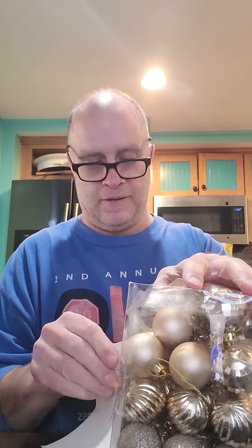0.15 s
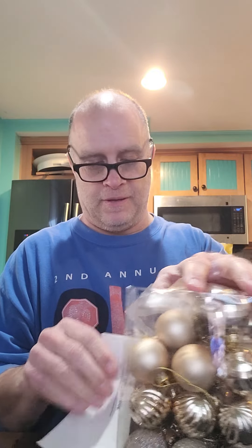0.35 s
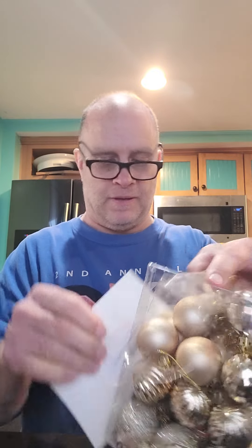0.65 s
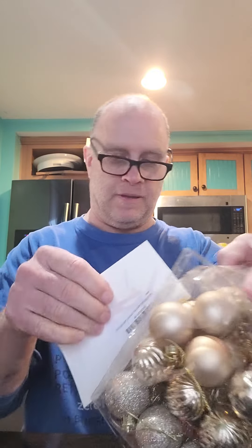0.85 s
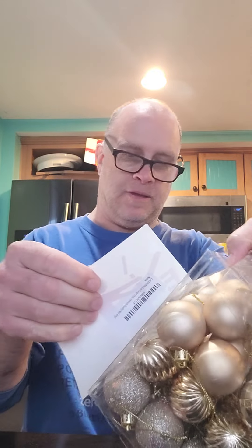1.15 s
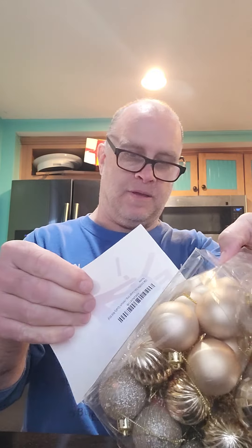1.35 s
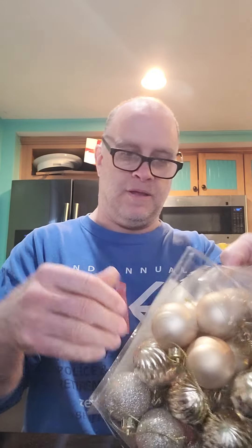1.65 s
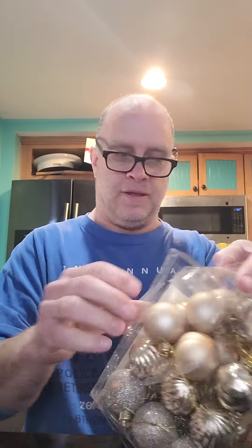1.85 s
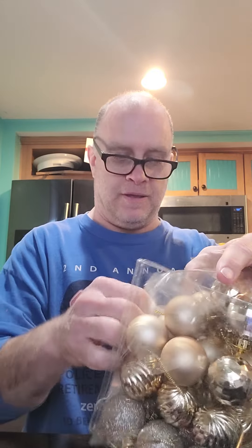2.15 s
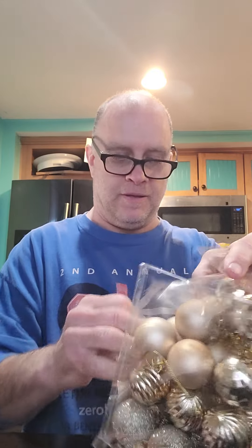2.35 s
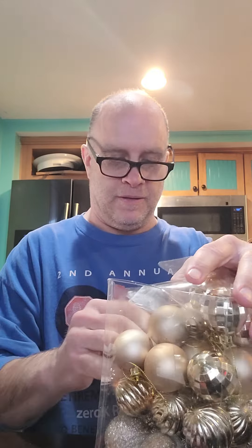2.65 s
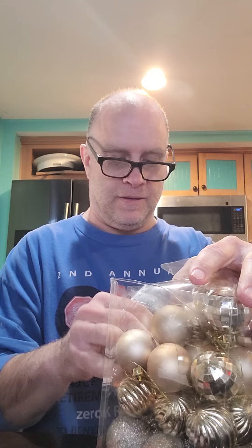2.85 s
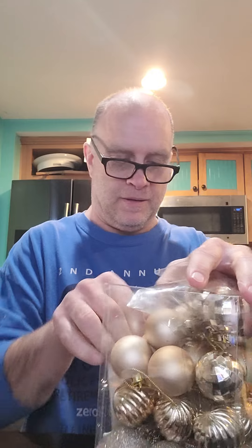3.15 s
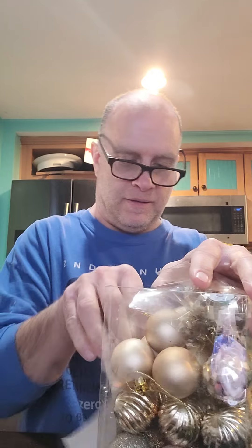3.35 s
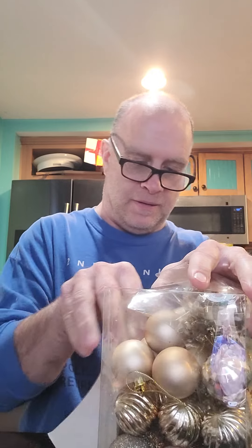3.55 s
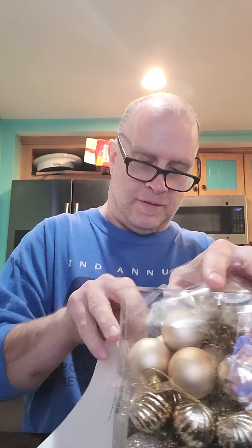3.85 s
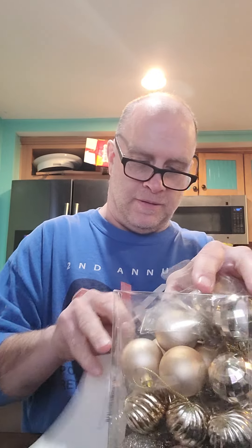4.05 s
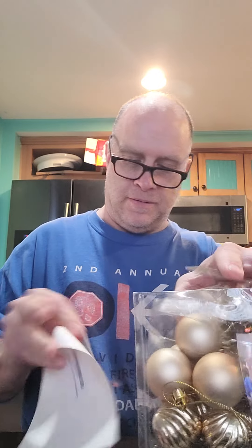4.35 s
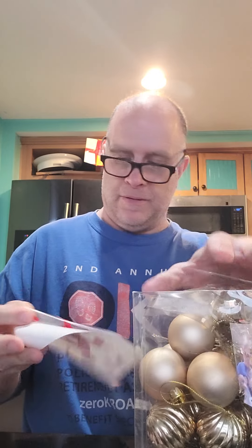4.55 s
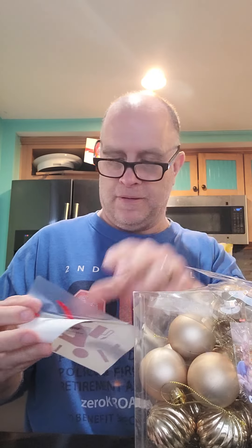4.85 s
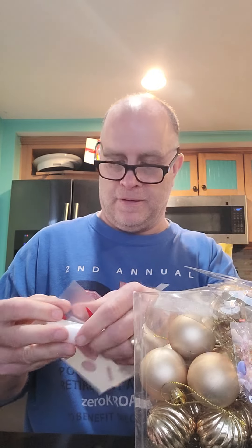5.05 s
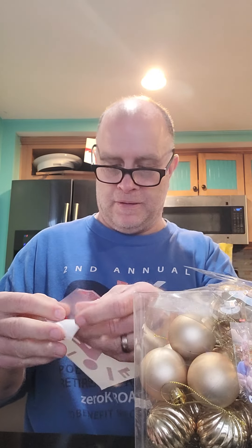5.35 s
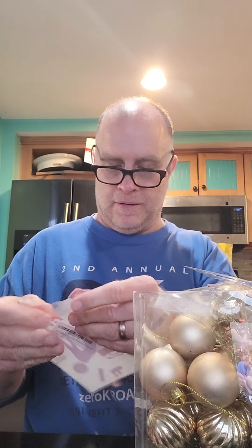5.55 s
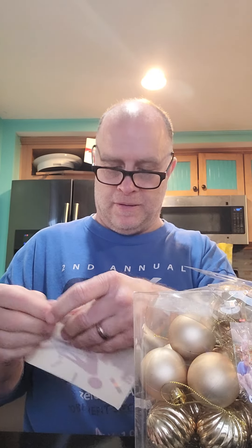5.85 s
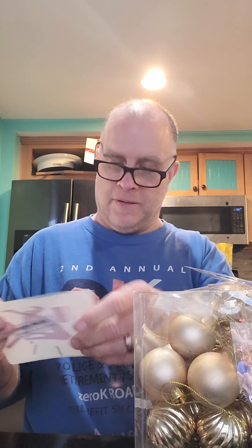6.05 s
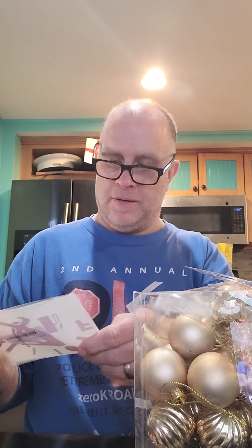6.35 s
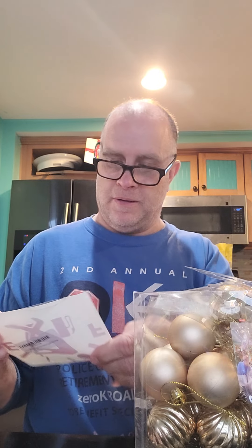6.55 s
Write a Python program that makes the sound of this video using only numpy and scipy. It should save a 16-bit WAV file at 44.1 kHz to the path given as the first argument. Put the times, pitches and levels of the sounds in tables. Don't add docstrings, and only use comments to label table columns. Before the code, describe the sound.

Close stereo phone pickup, slightly stronger on the right, with a short, small-room echo. Thin rigid plastic buckles in sharp cracks, dents pop hollowly, corners ping, and the box thuds on the table. Sparse crackles build to two dense bursts, the second strongest. Afterwards a label rustles and creases quietly. A very faint refrigerator hum surfaces only with the handling.

```python
import sys
import numpy as np
from scipy import signal
from scipy.io import wavfile

SR = 44100
rng = np.random.default_rng(int(sys.argv[2]) if len(sys.argv) > 2 else 0)


def to_wav(sig):
    pcm = np.clip(np.atleast_2d(sig), -1, 1) * 32767
    pcm = np.round(pcm).astype(np.int16)
    wavfile.write(sys.argv[1], SR, pcm.T)


def gain_from_db(level_db):
    decades = np.asarray(level_db, float) / 20
    return 10 ** decades


N = 295029
PORT_LAG = 12


def rms_one(x):
    return x / np.sqrt(np.mean(x ** 2) + 1e-20)


def at_hz(points, hz):
    table_hz, value = np.transpose(points)
    return np.interp(np.log(hz), np.log(table_hz), value)


def band(x, low_hz, high_hz):
    sos = signal.butter(2, [low_hz, min(high_hz, SR / 2.2)], "band", fs=SR, output="sos")
    return signal.sosfilt(sos, x)


def drift(rate_hz):
    r = np.exp(-80 * np.pi * rate_hz / SR)
    slow = signal.lfilter([1], [1, -2 * r, r * r], rng.standard_normal(N // 40 + 2002))[2000:]
    return np.interp(np.arange(N) / 40, np.arange(len(slow)), rms_one(slow))


def clicks(times_s, heights):
    train = np.full(N, 1e-18)
    train[np.clip((np.asarray(times_s) * SR).astype(int), 0, N - 1)] = heights
    return train


def ring(train, hz, t60_s):
    r, w = gain_from_db(-60 / (t60_s * SR)), 2 * np.pi * hz / SR
    return signal.lfilter([0, np.sin(w)], [1, -2 * r * np.cos(w), r * r], train)


def dying(train, t60_s):
    return signal.lfilter([1], [1, -gain_from_db(-60 / (t60_s * SR))], train)


def struck(rows, t60_s, cycles):
    out, t = np.zeros(N + SR), np.arange(SR // 4) / SR
    for s, peak_db, hz in rows:
        at = round(s * SR)
        decay_s = t60_s + cycles / hz
        out[at:at + len(t)] += gain_from_db(peak_db - 60 * t / decay_s) * np.sin(2 * np.pi * hz * t)
    return out[:N]


def contact(x, length_s):
    push = np.hanning(max(round(length_s * SR), 3))
    return np.convolve(x, push / push.sum())[:N]


def pair(white, hz):
    # frequency in [Hz], left-right likeness [0 to 1].
    port_likeness = [(60, 0.87), (180, 0.93), (550, .92), (1650, 0.6), (4970, 0.1), (15000, 0.02)]
    alike = np.clip(at_hz(port_likeness, hz), 0, 1)
    return np.sqrt(1 + alike) * white[0] + np.sqrt(1 - alike) * white[1] * np.array([[1], [-1]])


def coloured(white, spectrum, low_hz, high_hz, flicker_db):
    out = 0
    edges_hz = low_hz * 2 ** np.arange(0, np.log2(high_hz / low_hz) + .4, .5)
    for k, (low, high) in enumerate(zip(edges_hz, edges_hz[1:])):
        hz = np.sqrt(low * high)
        level = gain_from_db(at_hz(spectrum, hz) + flicker_db * drift(17))
        out = out + level * band(pair(white[k % 2], hz), low, high)
    return rms_one(out)


def refrigerator():
    # line frequency in [Hz], level in [dB].
    compressor_lines = [(60, -85), (268, -66), (545, -72)]
    waver_s = np.cumsum(1 + 0.015 * drift(8.8)) / SR
    hum = 0
    for hz, level_db in compressor_lines:
        hum = hum + gain_from_db(level_db + 3.5 + 2.0 * drift(2.7)) * np.sin(2 * np.pi * hz * waver_s)
    return hum


def table_rumble(rub_db):
    # time in [s], rumble level in [dB].
    arm_lean = [(0.0, -51), (0.26, -59), (0.61, -57), (1.08, -73), (1.75, -46), (1.92, -60), (2.44, -45),
                (2.79, -72), (3.72, -58), (4.15, -58), (4.319, -53.5), (4.531, -60), (4.73, -71),
                (5.38, -75), (5.55, -71), (6.32, -62), (6.45, -58.5), (6.69, -70.5)]
    lean_db = np.interp(np.arange(N) / SR, *np.transpose(arm_lean))
    level_db = lean_db - 0.5 + 0.46 * (rub_db - rub_db.mean())
    side = 0.27 * rng.standard_normal(N) * [[1], [-1]]
    rumble = rms_one(band(rng.standard_normal(N) + side, 28, 230))
    return gain_from_db(level_db + 2.0 * drift(1.6)) * rumble


def thuds():
    # time in [s], peak in [dB], pitch in [Hz].
    table_thuds = [(0.048, -33.5, 154.8), (0.407, -32, 116), (0.508, -39, 89), (0.662, -34, 74),
                   (1.688, -47, 132), (1.764, -39, 138), (1.982, -46, 100), (2.089, -37, 103),
                   (2.154, -37, 137), (2.347, -21, 162.5), (2.413, -27.5, 76), (2.587, -58, 51.1),
                   (2.586, -50, 148), (2.687, -51, 139), (2.97, -54, 156), (3.187, -40, 127),
                   (3.349, -32, 162), (3.498, -29, 146), (3.653, -53.5, 140.5), (3.83, -36.5, 163.4),
                   (3.828, -30, 136), (3.982, -26, 157), (4.201, -34.5, 160), (4.205, -25, 89),
                   (4.478, -39, 160), (4.574, -31, 160), (5.642, -45, 144), (6.284, -48, 96),
                   (6.412, -30.5, 106), (6.572, -42, 118), (0.17, -48, 60), (0.92, -48, 65), (1.3, -50, 60),
                   (1.37, -53, 62), (1.84, -45, 60), (3.09, -52, 62), (3.27, -45, 60), (4.3, -37, 65),
                   (4.68, -48.5, 70), (6.33, -45, 60)]
    out, t = np.zeros(N + SR), np.arange(SR // 5) / SR
    for s, peak_db, hz in table_thuds:
        at = round((s + .007) * SR)
        out[at:at + len(t)] += gain_from_db(peak_db + 3.0 - 60 * t / 0.072) * np.sin(2 * np.pi * hz * t)
    return contact(out[:N], 0.0068)


def strokes():
    # start in [s], length in [s], rustle in [dB], rubbing in [dB].
    hand_strokes = [(0.0, 0.015, -30.5, -21), (0.379, 0.085, -50, -41.5), (0.522, 0.4, -61, -46.5),
                    (1.113, 0.035, -60, -43.5), (1.295, 0.072, -76, -53), (1.45, 0.15, -72.5, -63.5),
                    (1.638, .12, -60.5, -45.5), (1.954, .08, -66, -43), (2.081, .25, -57, -40),
                    (2.429, 0.23, -53.5, -45.5), (2.619, 0.19, -60, -43.5), (4.76, .2, -71.5, -73.5),
                    (2.925, .07, -67, -54), (3.099, .2, -64, -51), (3.352, 0.18, -56, -45.5),
                    (3.52, 0.28, -55.5, -50), (3.758, .2, -47.5, -46), (4.049, 0.2, -31.5, -23.5),
                    (4.243, .07, -66, -34.5), (4.419, 0.18, -59, -41.5), (4.63, 0.091, -71.5, -59),
                    (5.111, .09, -67.5, -62.5), (5.206, .05, -56, -54), (5.303, 0.095, -57, -56.5),
                    (5.455, 0.2, -50, -51), (5.705, .11, -58.5, -57), (5.877, .05, -58.5, -51),
                    (5.956, 0.12, -45.5, -45.5), (6.217, 0.2, -66.5, -56.5), (6.523, 0.03, -60, -58)]
    rise_db_per_s, fall_db_per_s = 291.5, 214
    rest_db = np.array([[-91.5], [-63.5]])
    t = np.arange(0, N + 40, 40) / SR
    power = gain_from_db(2 * rest_db) * np.ones(len(t))
    for s, length_s, *levels_db in hand_strokes:
        fade_db = rise_db_per_s * np.maximum(s - t, 0) + fall_db_per_s * np.maximum(t - s - length_s, 0)
        power = power + gain_from_db(2 * (np.array(levels_db)[:, None] - fade_db))
    return [np.interp(np.arange(N) / SR, t, 10 * np.log10(p)) for p in power]


def grains(per_s, spread_db, smooth):
    born = rng.random(N) < per_s * gain_from_db(4.0 * drift(25.0)) / SR
    sizes = gain_from_db(spread_db * np.minimum(rng.exponential(1, N), 4)) * born
    return (rms_one(sizes) + smooth) * rng.standard_normal((2, 2, N))


def hands(rustle_db, rub_db):
    # frequency in [Hz], density in [dB per Hz].
    rustle_spectrum = [(710, -36), (1200, -6), (1440, -5), (2790, -13.5), (5020, -2), (8820, -9),
                       (12300, -10.5), (16000, 2.5)]
    rub_spectrum = [(76, -35), (130, -17), (188, -11), (269, 2.5), (307, -17.5), (351, 6), (830, -22),
                    (1020, -8), (2210, -24), (4500, -25), (5850, -58), (9900, -120)]
    paper = grains(3000, spread_db=2.5, smooth=1.1)
    skin = grains(1200, spread_db=2.5, smooth=.45)
    rustle = gain_from_db(rustle_db - 2) * coloured(paper, rustle_spectrum, 1400, 16500, flicker_db=1.6)
    rub = gain_from_db(rub_db - 6) * coloured(skin, rub_spectrum, 140, 4400, flicker_db=1.5)
    return rustle + rub


def pushes():
    # time in [s], peak in [dB], knock in [dB], wall pitch in [Hz].
    firm_pushes = [(0.049, -16, -9, 250), (0.41, -31, -17, 240), (0.667, -35, -9, 377),
                   (0.882, -37, -1, 261), (1.006, -41, 2.5, 261), (1.117, -37.5, 2, 242),
                   (1.773, -24.5, 2, 231), (1.991, -34, -5.5, 223), (2.093, -30.5, -2.5, 261),
                   (2.213, -40, -11, 272), (2.361, -15.5, -16.5, 250), (2.473, -33, 1, 417),
                   (2.596, -23, -7, 264), (2.688, -27.5, -11.5, 272), (2.997, -29.5, -3, 355),
                   (3.23, -39.5, -3, 439), (3.795, -19, -4.5, 261), (3.827, -15.5, -7.5, 353),
                   (3.876, -19.5, -11.5, 234), (3.997, -13, -6.5, 245), (4.081, -20.5, -7, 353),
                   (4.121, -24, -10, 406), (4.142, -18.5, -10, 245), (4.173, -18.5, -5.5, 275),
                   (4.216, -12, -9, 275), (4.233, -12, -13, 272), (4.595, -27, -6.5, 417),
                   (5.503, -44.5, -16, 425), (5.646, -34.5, -5, 439), (6.282, -37, -4, 269),
                   (6.421, -38, 4, 439)]
    # time in [s], peak in [dB], knock in [dB], wall pitch in [Hz].
    further_pushes = [
        (4.209, -12, -14.5, 347),
        (4.221, -13.5, -15, 470),
        (3.845, -20, -16.5, 180),
    ]
    # time in [s], peak in [dB], pitch in [Hz].
    finger_nudges = [(0.122, -36.5, 283), (0.606, -43, 260), (0.762, -36.5, 360), (1.27, -46, 265),
                     (1.359, -45, 266), (1.641, -36, 282), (1.916, -43, 237), (2.054, -39.5, 338),
                     (2.24, -35.5, 263), (2.311, -30.5, 358), (2.431, -25, 256), (2.533, -40, 363),
                     (2.579, -29, 375), (2.614, -26.5, 352), (2.815, -40.5, 334), (2.965, -40, 234),
                     (3.344, -38, 413), (3.463, -37.5, 267), (3.509, -30.5, 361), (3.663, -32.5, 246),
                     (3.712, -30, 262), (4.05, -23.5, 346), (4.299, -31.5, 433), (4.434, -31, 266.4),
                     (4.488, -31.5, 245), (4.53, -38, 258), (4.975, -57, 250), (5.11, -60, 423),
                     (5.177, -47, 261.5), (6.543, -47, 263), (6.576, -39.5, 243)]
    # frequency in [Hz], level in [dB], t60 in [s].
    box_modes = [(205, -9, .08), (240, 0, .11), (278, 0, .14), (350, 1, .13), (420, -5, .07)]
    soft = [(s, db, -12, hz) for s, db, hz in finger_nudges]
    s, peak_db, knock_db, pitch_hz = np.transpose(list(firm_pushes) + list(further_pushes) + soft)
    luck_db = rng.normal(0, 3.5, (len(s), 6))
    boom = gain_from_db(1.0) * struck(zip(s, peak_db, pitch_hz), t60_s=0.12, cycles=0)
    for k, (hz, level_db, t60_s) in enumerate(box_modes):
        late_s = s + 0.0015 * k
        boom += ring(clicks(late_s, gain_from_db(peak_db + level_db - 10 + luck_db[:, k])), hz, t60_s)
    knock = dying(clicks(s, gain_from_db(peak_db + knock_db + 16)), 0.042) * rng.standard_normal(N)
    box = contact(boom, 0.0012) + band(knock, 330, 1000)
    return np.array([np.roll(box, PORT_LAG), box])


def pops():
    # time in [s], peak in [dB], pitch in [Hz].
    dent_pops = [(0.042, -7.5, 651), (0.318, -33, 1400), (0.882, -33, 980), (1.122, -47, 1200),
                 (1.773, -17.5, 686), (1.987, -38, 662), (2.194, -32, 1010), (2.304, -14.5, 972),
                 (2.328, -15, 888), (2.355, -5.5, 991), (2.378, -23, 1030), (2.42, -24, 1120),
                 (2.459, -32, 1080), (2.73, -34, 1020), (2.768, -33.5, 651), (2.846, -42, 867),
                 (2.989, -16, 966), (3.512, -28.5, 727), (3.768, -25.5, 964), (3.79, -7, 1230),
                 (3.837, -5.5, 961), (3.871, -13.5, 1570), (3.994, -15, 939), (4.043, -13, 1570),
                 (4.071, -10, 1220), (4.13, -12, 966), (4.141, -12.5, 1250), (4.177, -9, 1260),
                 (4.191, -4, 1230), (4.207, -10, 1360), (4.584, -24, 1030), (4.704, -54.5, 1110),
                 (4.971, -58.5, 956), (6.283, -35.5, 651), (6.422, -39, 883)]
    # time in [s], peak in [dB], pitch in [Hz].
    corner_pings = [(0.043, -6.5, 3840), (0.0522, -10, 4640), (1.0031, -31, 3350), (1.1207, -31, 3200),
                    (1.763, -35, 4470), (1.7973, -26, 3640), (2.3107, -16, 4690), (2.3274, -6.5, 5090),
                    (2.3319, -4.5, 5240), (2.353, -11.5, 4110), (2.3634, -17, 4940), (2.3767, -10, 5130),
                    (2.4187, -15, 4070), (2.7297, -35, 4370), (2.962, -23, 3930), (3.2296, -36, 3280),
                    (3.3474, -31.5, 5050), (3.5129, -23.5, 3090), (3.7903, -12, 2600), (3.8347, -8.5, 3110),
                    (3.8711, -10, 3380), (3.9914, -8, 2720), (4.0422, -12.5, 3580), (4.0706, -9, 3680),
                    (4.129, -10, 3280), (4.142, -10.5, 4640), (4.178, -11, 3020), (4.2074, -9, 2640),
                    (4.481, -26, 3650), (5.2884, -41, 3170), (5.5046, -19.5, 5030), (5.6473, -20, 4420)]
    pop = gain_from_db(-4) * struck(dent_pops, t60_s=0, cycles=24)
    pop += gain_from_db(-2.5) * struck(corner_pings, t60_s=0, cycles=40.0)
    return np.array([np.roll(pop, PORT_LAG // 2), pop])


def buckles():
    # time in [s], peak in [dB], dull part in [dB], bright part in [dB].
    wall_wrenches = [(0.0074, -19, -9.5, -0.5), (0.0449, 4.5, -23.5, -7.5), (0.0509, -12.5, -15, -7),
                     (2.3044, -9, -10.5, -3), (2.328, -1.5, -17, -5), (2.355, -3.5, -9, -3),
                     (2.3787, -17, -10, -5), (2.404, -10, -17, -0.5), (2.421, -11.5, -19, -4.5),
                     (2.4598, -15.5, -18, -7), (3.791, 2, -23.5, -10.5), (3.8198, -12, -10.5, -14.5),
                     (3.836, -0.5, -14.5, -6.5), (3.8713, 1, -17.5, -8.5), (3.9935, 1, -17.5, -5.5),
                     (4.0423, -3.5, -19, -11), (4.071, 2, -24, -7), (4.129, -5, -11, -14.5),
                     (4.1433, -1, -16, -4), (4.16, -11.5, -20.5, -6), (4.1795, -4, -17, -7),
                     (4.1954, -3.5, -13.5, -9), (4.208, 0, -14, -8.5), (4.235, -18, 2.5, -8)]
    # time in [s], peak in [dB], dull part in [dB], bright part in [dB].
    sheet_snaps = [(0.3181, -26, -11, -22), (0.377, -35, -16, 1), (0.4142, -26.5, -12.5, -0.5),
                   (0.4374, -29.5, -30, 1.5), (0.448, -29.5, -25, 8.5), (0.4547, -39.5, -17, -2),
                   (0.6693, -30, -13, -14), (0.78, -30.5, -21.5, -9.5), (1.0026, -21.5, -27, -0.5),
                   (1.1216, -21, -17.5, -2), (1.1962, -35, -27, -13), (1.3601, -37, -30, -10),
                   (1.689, -25.5, -23, -8.5), (1.763, -20, -33, -3.5), (1.7741, -22.5, -7, -19),
                   (1.7975, -9, -72, -11), (1.9879, -28.5, -7, -11.5), (2.1934, -41.5, 1, -12),
                   (2.7676, -30.5, -16, -8), (2.9617, -28.5, -21.5, -2.5), (2.989, -20, -16, -3.5),
                   (3.2294, -33, -10.5, 0), (3.5122, -7.5, -29, -19.5), (3.6915, -32, -19, 5),
                   (3.711, -27, -9, -7), (3.7682, -29, -4, -3.5), (4.43, -39, -6, -3),
                   (4.4816, -16.5, -21, -2), (4.584, -28, -2.5, -9.5), (4.6087, -30.5, -7.5, -2.5)]
    # time in [s], peak in [dB].
    sheet_ticks = [(0.243, -40.5), (0.3617, -35), (0.514, -35.5), (0.586, -36.5), (0.6556, -32),
                   (0.6925, -30.5), (0.8299, -35.5), (0.883, -30.5), (0.9348, -35.5), (1.078, -41),
                   (1.4386, -42.5), (1.6536, -44), (2.0833, -32), (2.1533, -36.5), (2.2111, -30.5),
                   (2.535, -31.5), (2.691, -38.5), (2.7306, -31.5), (2.8487, -41), (3.1572, -40),
                   (3.295, -36.5), (3.3258, -38), (3.3478, -33.5), (3.4677, -29.5), (3.6508, -36.5),
                   (3.6712, -34.5), (4.7433, -57), (4.812, -61.5), (2.296, -35.5), (5.8155, -56),
                   (6.136, -51), (0.595, -41), (1.209, -43.5), (1.293, -53), (1.368, -41), (1.6415, -44),
                   (1.697, -42), (2.004, -38), (2.105, -39.5), (3.308, -41), (3.605, -45), (5.112, -50.5),
                   (5.198, -48), (5.222, -52)]
    # time in [s], peak in [dB], bright part in [dB].
    label_creases = [(5.1533, -49, -4), (5.1768, -39.5, -9.5), (5.238, -37.5, -3), (5.2867, -40, -4),
                     (5.3117, -38, 1), (5.359, -45, -2), (5.4733, -37, 3), (5.476, -34.5, 0),
                     (5.5043, -16.5, 2), (5.5217, -23, -0.5), (5.6462, -24.5, -1.5), (5.6507, -27, 6),
                     (5.873, -38, -28), (5.9567, -52, 17), (6.0887, -31, -2.5), (6.2845, -34, -6),
                     (6.2978, -33, -2), (6.353, -39, 13.5), (6.4225, -34.5, -7), (6.456, -41.5, 4)]
    after = [(s + 0.0084 * rng.uniform(0.44, 1.0), db - 11.5, dull, bright)
             for s, db, dull, bright in wall_wrenches]
    ticks = [(s, db, -15.5, -6.5) for s, db in sheet_ticks]
    creases = [(s, db, -24, bright) for s, db, bright in label_creases]
    return np.transpose(list(wall_wrenches) + after + list(sheet_snaps) + ticks + creases)


def snaps():
    # frequency in [Hz], level in [dB], t60 in [s].
    panel_modes = [(650, -6, .04), (845, -6, .04), (980, 0, .045), (1250, 0, .045), (1360, -3, .04),
                   (1580, -5, .035), (2250, -6, .03), (2550, -5, .03), (3150, -8, .025), (4300, -9, .02)]
    treble_lag = .3
    s, peak_db, dull_db, bright_db = buckles()
    out, white = np.zeros((2, N)), rng.standard_normal((2, 2, N))
    edges_hz = np.geomspace(560, 18000, 9)
    luck = rng.normal(0, 1, (len(s), 20))
    side = gain_from_db(np.outer([.5, -.5], 2.6 * luck[:, 19]))
    for k, (low, high) in enumerate(zip(edges_hz, edges_hz[1:])):
        hz = np.sqrt(low * high)
        tilt_db = np.array([
            at_hz([(680, a + 2), (1100, a + 8), (3000, -8.0), (8500, b - 5), (12500, b + 0.89)], hz)
            for a, b in zip(dull_db, bright_db)])
        height = gain_from_db(peak_db + tilt_db + 1.6 * luck[:, k]) * np.sqrt(SR / 4 / (high - low))
        trains = [clicks(s, height * g) for g in side]
        crack = np.array([dying(train, 0.02 + 5.9 / hz) for train in trains])
        spike = np.array([0.12 * dying(train, 0.00037) for train in trains])
        if hz > 6000:
            crack = crack - treble_lag * np.array([dying(train, 0.0038) for train in trains])
            spike = (1 - treble_lag) * spike
        out += band(crack * pair(white[k % 2], hz) + spike * white[0, 0], low, high)
    for k, (hz, level_db, t60_s) in enumerate(panel_modes):
        share = np.clip(np.log2(3000 / hz) / 2.5, 0, 1)
        mode_db = peak_db + share * dull_db + level_db - 18.5 + 3.5 * luck[:, 8 + k]
        out += ring(clicks(s, gain_from_db(mode_db)), hz, t60_s)
    return gain_from_db(-6.5) * out


def kitchen(x):
    t60_s, tail_db, echo_s, echo_db = 0.21, -6.5, 0.0076, -9.5
    t = np.arange(round(.4 * SR)) / SR
    white = rng.standard_normal((2, len(t)))
    bass = signal.lfilter([.2], [1, -.8], white)
    tail = (white - bass + bass[0]) * gain_from_db(-60 * t / t60_s) * np.clip(t / 0.0057, 0, 1)
    tail = signal.sosfilt(signal.butter(1, 150, "high", fs=SR, output="sos"), tail)
    tail = tail - 0.6 * band(tail, 360, 2500) * np.clip(t / 0.018, 0, 1)
    tail *= gain_from_db(tail_db) / np.sqrt(np.sum(tail ** 2, axis=1, keepdims=True))
    at = round(echo_s * SR)
    tail[[0, 1], [at, at + 9]] += gain_from_db(echo_db)
    return signal.fftconvolve(x, tail, axes=1)[:, :N]


def scene():
    lean = gain_from_db(3.7 * np.array([[-.5], [.5]]))
    rustle_db, rub_db = strokes()
    gate = gain_from_db(0.32 * np.clip(rub_db + 53.5, -14, 8))
    table = table_rumble(rub_db) + gate * refrigerator() + thuds()
    crackle = lean * (snaps() + pops() + hands(rustle_db, rub_db))
    boom = lean * pushes()
    wet = kitchen(crackle + gain_from_db(-7) * boom)
    hiss = gain_from_db(-96) * rng.standard_normal((2, N))
    return crackle + boom + wet + lean * table + hiss


def low_pass(x):
    return signal.sosfilt(signal.butter(12, 16960, fs=SR, output="sos"), x)


def record(dry):
    shut_s, open_s, shut_hz = 4.97, 5.11, 2400
    heard = .88 * np.tanh(dry / .88)
    heard = signal.sosfilt(signal.butter(6, 45, "high", fs=SR, output="sos"), heard)
    still = np.interp(np.arange(N) / SR, [shut_s, shut_s + .07, open_s - .005, open_s], [0, 1, 1, 0])
    dull = signal.sosfiltfilt(signal.butter(6, shut_hz, fs=SR, output="sos"), heard)
    heard = heard + .75 * still * (dull - heard)
    mix = signal.sosfilt(signal.ellip(10, .5, 42, 15800, fs=SR, output="sos"), heard)
    return low_pass(mix)


dry = scene()
out = record(dry)
to_wav(out)
```